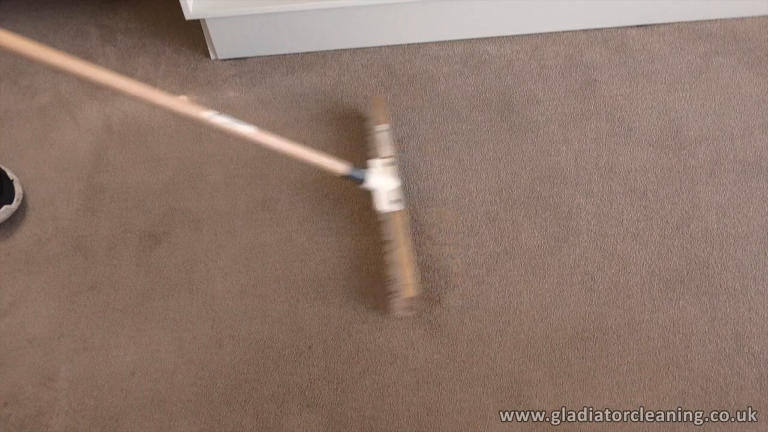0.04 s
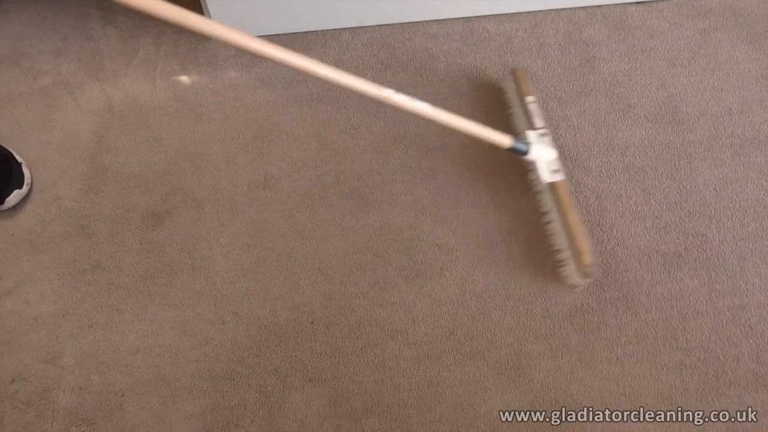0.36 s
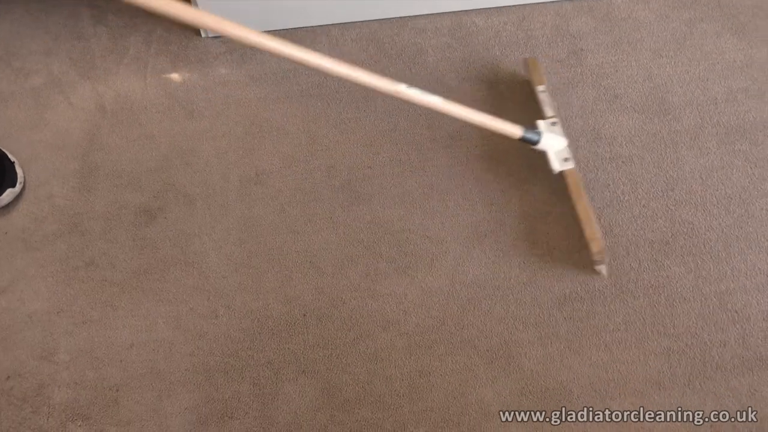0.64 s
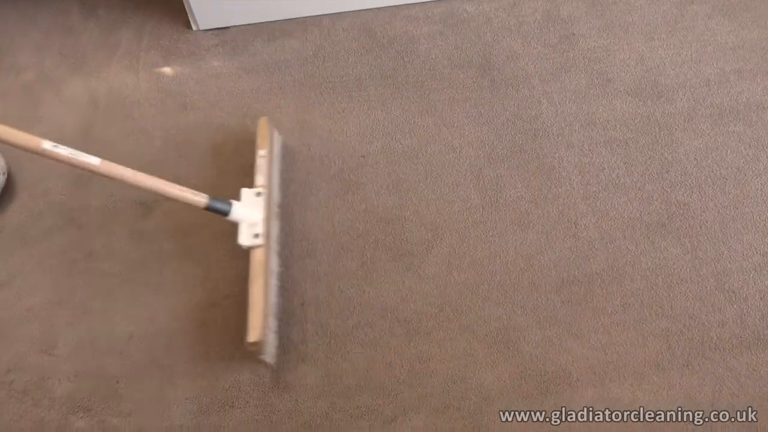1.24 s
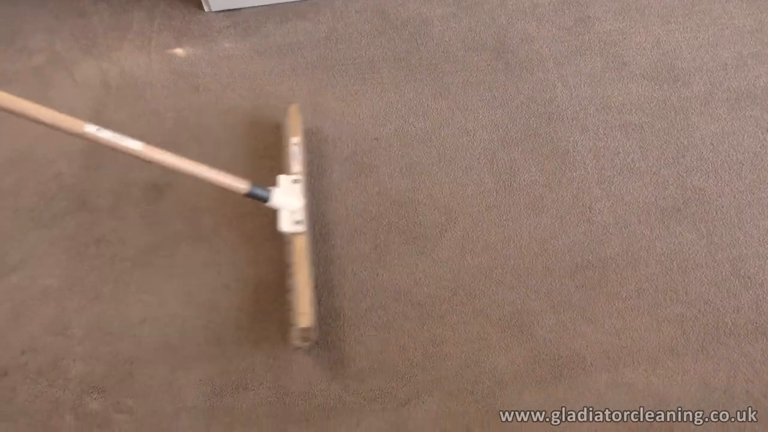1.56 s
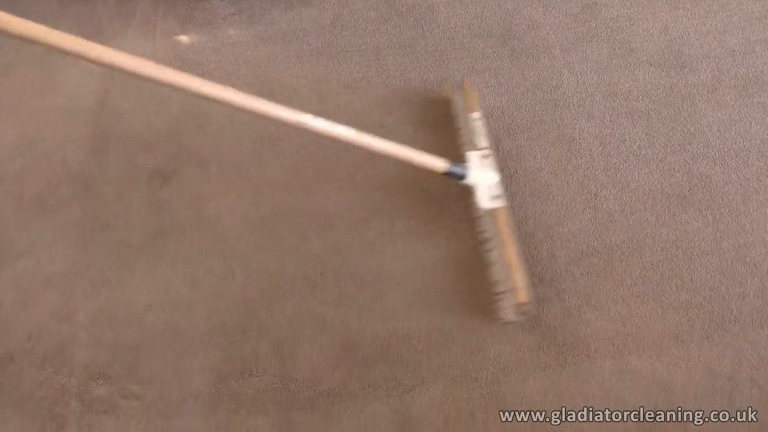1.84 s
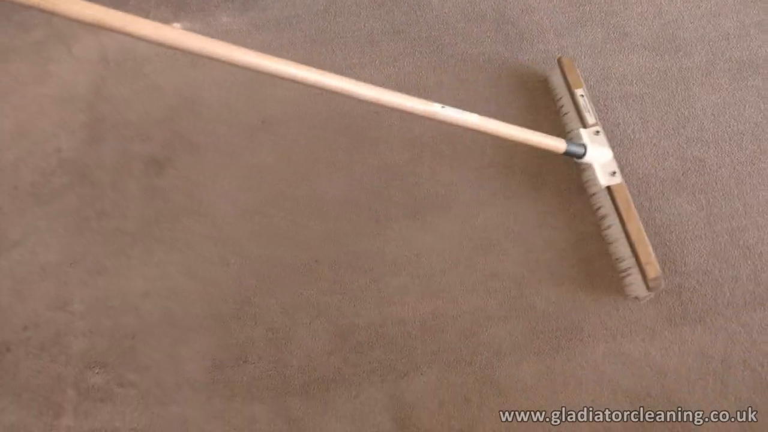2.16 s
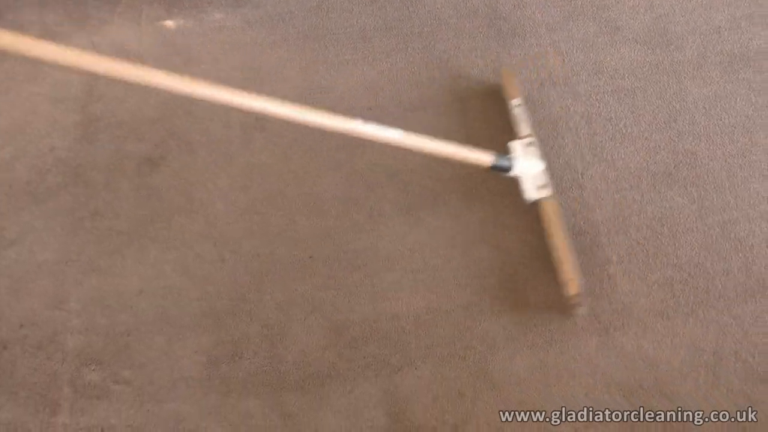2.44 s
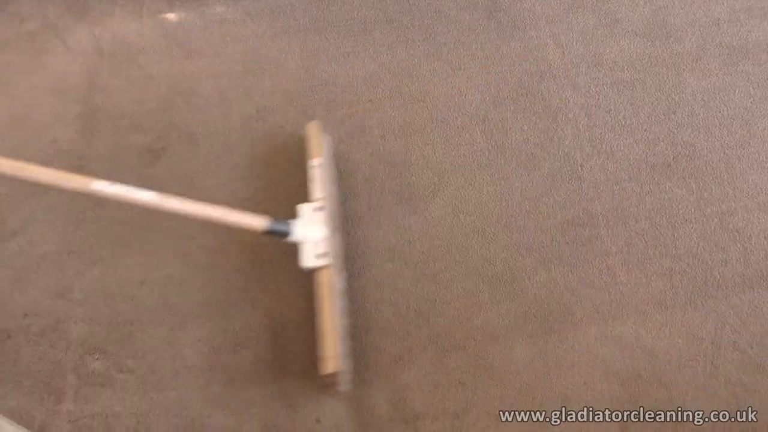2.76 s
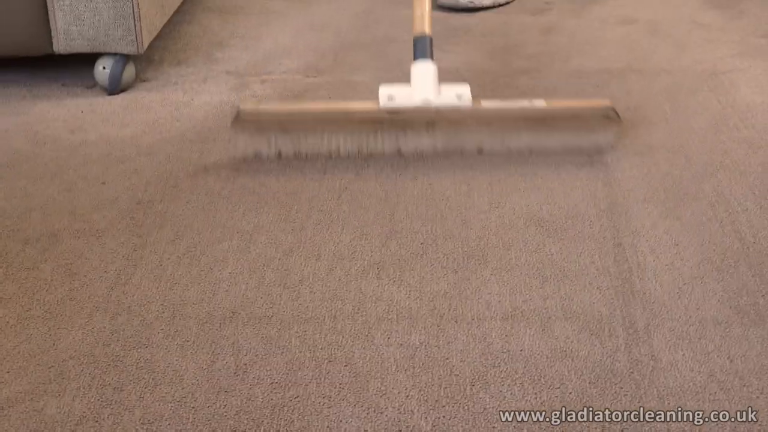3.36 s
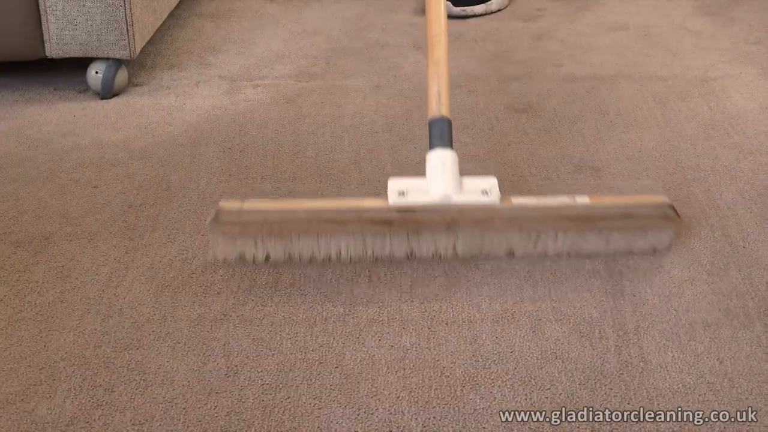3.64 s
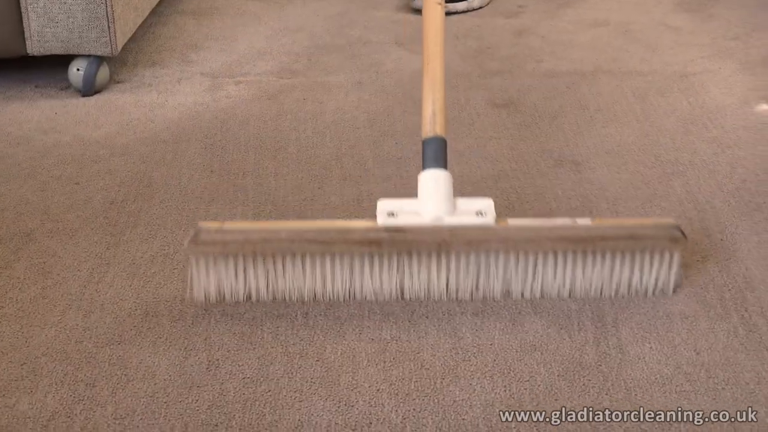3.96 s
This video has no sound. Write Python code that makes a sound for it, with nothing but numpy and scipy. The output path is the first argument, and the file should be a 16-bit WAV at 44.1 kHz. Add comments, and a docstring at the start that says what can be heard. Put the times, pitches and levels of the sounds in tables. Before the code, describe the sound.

A bristle broom swishes back and forth over carpet in five long, hissing strokes.

```python
"""In a furnished room, a wide bristle broom is pushed and pulled over a carpet in five long strokes.
Bristle tips flick off the carpet and hiss; tufts tug at the wooden head and make a lower scrubbing sound.
Lightly skimming bristles sing briefly, and the handle ticks and creaks around the first few turns.
The floor takes a few soft thuds over a faint rumble, and a low hum, like a motor gathering speed,
swells under the last two strokes. It is all heard in mono."""
import sys
import numpy as np
from scipy import signal
from scipy.fft import rfft, irfft
from scipy.io import wavfile

SR = 44100
rng = np.random.default_rng(int(sys.argv[2]) if len(sys.argv) > 2 else 0)


def store_pcm(level_fs):
    """Save levels as 16-bit WAV."""
    pcm = np.round(np.clip(level_fs, -1, 1) * 32767).astype(np.int16)
    wavfile.write(sys.argv[1], SR, np.atleast_2d(pcm).T)


N = 176400  # 4 seconds
T = np.arange(N) / SR

# The tone of the room's rumble. Each row: frequency in Hz, relative level in dB.
RUMBLE_TONE = [(20, -11), (45, 0), (65, -6), (83, 4.5), (105, -8.5), (150, -5), (300, -18), (1000, -33),
               (4000, -29.5), (15000, -67)]
# How the hum swells. Each row: time in seconds, level in dB.
HUM_SWELL = [(2.401, -56), (2.6, -39), (2.75, -30), (2.98, -29), (3.14, -27.5), (3.48, -29), (3.72, -34),
             (3.95, -33), (4.0, -30)]
# The head knocks on the carpet. Each row: start in seconds, level in dB, decay in seconds, pitch in Hz.
HEAD_KNOCKS = [(.425, -31.5, 0.081, 136), (2.1, -33.5, 0.088, 135), (2.72, -34, 0.051, 119),
               (2.92, -32, 0.041, 100), (3.58, -32.5, 0.091, 201), (3.72, -30.5, 0.095, 184)]
# Shifting weight swings the floor. Each row: start in seconds, level in dB, decay in seconds, pitch in Hz.
FLOOR_SWINGS = [(.405, -28.5, .13, 42.2), (1.265, -34, 0.031, 50), (3.89, -32, .04, 36)]

# The handle ticks. Each row: start in seconds, level in dB, pitch in Hz.
HANDLE_TICKS = [(0.6976, -30.5, 3420), (1.4719, -26.5, 4800), (2.371, -35, 3130)]
# The notes in one tick. Each row: multiple of its pitch, relative level in dB, decay in seconds.
TICK_NOTES = [(.62, -9.5, 0.0013), (1, -0.5, .0011), (1.25, -4, 0.00068)]
# The handle creaks. Each row: middle in seconds, half length in seconds, level in dB, pitch in Hz.
HANDLE_CREAKS = [(0.376, 0.029, -44, 2740), (0.548, 0.013, -44, 2640), (1.423, 0.013, -45, 2660),
                 (1.484, 0.017, -45.5, 2650), (1.53, 0.0087, -50, 2700)]
# Bristles sing. Each row: middle in seconds, half length in seconds, level in dB, pitch in Hz.
BRISTLE_SKIMS = [(0.97, 0.0093, -37, 4470), (3.04, .06, -48, 7150), (3.292, 0.043, -49, 8730),
                 (3.45, 0.087, -45, 8300)]

# The tone of the hiss when pushing, pulling, and pushing straight at the microphone.
# Each row: frequency in Hz, relative level in dB.
PUSH_TONE = [(900, -16), (1700, -5), (2200, -2), (2750, 3), (3500, 0), (4100, 1.5), (4750, 3.5),
             (5600, -2.5), (7800, 0), (9500, -.5), (11200, -2), (13000, -2.5), (15600, -7.5)]
PULL_TONE = [(900, -48), (1700, -24), (2250, -8.5), (2800, 2.5), (3900, 0.5), (4700, 5.5), (5500, -1),
             (6300, -1), (7200, 3.5), (8800, -0.5), (10200, 1.5), (11300, -3), (13300, 0.5), (15600, -7.5)]
FRONT_TONE = [(900, -18), (1700, -9), (2350, -6.5), (2750, 0.5), (3400, -5), (4050, -2.5), (4750, 0),
              (5700, -6), (7200, 0), (8700, -1), (11300, -4), (13000, -1.5), (15600, -8.5)]
# The tone of the carpet dragging on the head, and of the wooden head's own ring.
# Each row: frequency in Hz, relative level in dB.
DRAG_TONE = [(40, -6), (100, -9), (170, -2), (260, -.5), (370, 0.5), (480, 1.5), (780, -1.5), (960, -3),
             (1250, -7.5), (1700, -9.5), (2400, -14.5), (5000, -28.5)]
HEAD_TONE = [(150, -28), (400, -3.5), (560, 2), (770, 3), (980, 3), (1250, -5.5), (1800, -11), (3500, -27)]
# The strokes, with one list for each; the last push comes straight at the microphone.
# Each row: time in seconds, hiss level in dB, scrub level in dB (both before the boosts in sweep).
PUSH_STROKES = [
    [(.11, -69, -66), (.135, -53, -49.5), (.246, -42, -38), (.374, -38.5, -36.5), (.42, -38, -34),
     (.508, -35, -34), (.574, -39.5, -37), (.62, -45, -38), (.66, -58, -55)],
    [(1.5, -58, -52), (1.542, -47.5, -49), (1.592, -53, -45.5), (1.624, -39, -35), (1.695, -36.5, -33),
     (1.724, -32, -28.5), (1.825, -31, -28.5), (1.88, -34, -31.5), (1.96, -36, -34), (2.194, -36.5, -35.5),
     (2.262, -46, -42.5), (2.29, -59, -57), (2.31, -60, -57)],
    [(3.14, -59, -50), (3.178, -47.5, -45.5), (3.225, -50.5, -46), (3.262, -39, -33), (3.312, -44.5, -37.5),
     (3.356, -35.5, -31), (3.45, -32, -29), (3.6, -34.5, -30), (3.79, -33, -31), (3.87, -40, -37),
     (3.945, -41.5, -37.5), (4.0, -58, -53)],
]
PULL_STROKES = [
    [(.66, -53, -48), (.71, -50.5, -52), (.752, -40.5, -39.5), (.86, -35, -34.5), (1.02, -32.5, -32),
     (1.212, -34, -33), (1.372, -38, -37.5), (1.468, -47.5, -45), (1.5, -65, -60)],
    [(2.31, -54, -51), (2.39, -51, -51), (2.432, -41.5, -40), (2.552, -34, -33.5), (2.672, -32, -32.5),
     (2.81, -33.5, -31), (3.054, -38.5, -38), (3.108, -45.5, -44.5), (3.14, -57, -53)],
]


def amp(db):
    """Turns decibels into a number to multiply a sound by."""
    return 10 ** (np.asarray(db) / 20)


def evened(x):
    """Scales a sound to an average (rms) strength of 1."""
    return x / np.sqrt(np.mean(x ** 2) + 1e-20)


def colour(x, tone):
    """Gives a sound the lows and highs of a tone table, at a strength of 1."""
    hz, db = np.transpose(tone)
    freqs = np.fft.rfftfreq(N, 1 / SR)
    gain = amp(np.interp(np.log(freqs + 1), np.log(hz), db))
    return evened(irfft(rfft(x) * gain, N))


def band(hz, width_hz):
    """Noise kept to a band around one pitch."""
    freqs = np.fft.rfftfreq(N, 1 / SR)
    cut = 1 + (2 * (freqs - hz) / width_hz) ** 4
    return evened(irfft(rfft(rng.standard_normal(N)) / cut, N))


def wander(rate_hz):
    """A random wobble, up to about this fast."""
    return band(0, 2 * rate_hz)


def bump(start, rise_s, decay_s):
    """A level that rises softly, then dies away."""
    age = T - start
    return np.clip(age / rise_s, 0, 1) * np.exp(-np.maximum(age - rise_s, 0) / decay_s)


def bell_curve(middle, half_s):
    """A level that swells and fades evenly around one moment."""
    return np.exp(-.5 * ((T - middle) / half_s) ** 2)


def clicks(per_s, spread_db):
    """Tiny clicks of bristles letting go at random, most of them small."""
    sizes = amp(spread_db * np.minimum(rng.exponential(1, N), 5))
    return sizes * rng.choice([-1, 1], N) * (rng.random(N) < per_s / SR)


def room_echo(x, echo_db=-14, fade_s=0.054):
    """Adds the short echo of a furnished room, which drops 60 dB in fade_s."""
    t = T[:SR // 2]
    tail = rng.standard_normal(len(t)) * amp(-60 * t / fade_s) * (t > .005)
    return x + amp(echo_db) * signal.fftconvolve(x, tail / np.linalg.norm(tail))[:N]


def room_rumble(level_db=-42.5, start=0.15, rise_s=0.37):
    """A faint, deep noise that fades in and stays."""
    fade_in = np.clip((T - start) / rise_s, 0, 1) ** 2
    return amp(level_db) * colour(rng.standard_normal(N), RUMBLE_TONE) * fade_in


def hum(start_hz=58.1, climb_hz_per_s=10.2, octave_db=-16.5, waver_db=1.2):
    """A low, wavering note that slowly climbs, with a weak copy an octave higher."""
    times, db = np.transpose(HUM_SWELL)
    pitch = start_hz + climb_hz_per_s * (T - times[0])
    phase = 2 * np.pi * np.cumsum(pitch) / SR
    level = amp(np.interp(T, times, db) + waver_db * wander(rate_hz=8.9)) * (T > times[0])
    return level * evened(np.sin(phase) + amp(octave_db) * np.sin(2 * phase))


def floor_thuds(knock_rise_s=0.015, swing_rise_s=0.021):
    """The head knocks dully on the carpet, and the floor swings briefly under shifting weight."""
    out = np.zeros(N)
    for start, db, decay_s, hz in HEAD_KNOCKS:
        dull_noise = evened(np.tanh(band(hz, width_hz=0.66 * hz)))  # tanh rounds off the peaks
        out += amp(db) * bump(start, knock_rise_s, decay_s) * dull_noise
    for start, db, decay_s, hz in FLOOR_SWINGS:
        out += amp(db) * bump(start, swing_rise_s, decay_s) * np.sin(2 * np.pi * hz * (T - start))
    return out


def handle_ticks(snap_db=-12, snap_s=0.00057):
    """The handle's joint snaps and rings for an instant when the load on it reverses."""
    out = np.zeros(N)
    for start, db, hz in HANDLE_TICKS:
        age = np.maximum(T - start, 0)
        ring = sum(amp(note_db) * np.exp(-age / decay_s) * np.sin(2 * np.pi * multiple * hz * age)
                   for multiple, note_db, decay_s in TICK_NOTES)
        snap = amp(snap_db) * (T > start) * np.exp(-age / snap_s) * rng.standard_normal(N)
        out += amp(db) * (ring + snap)
    return out


def handle_creaks(slip_db=1.5):
    """The joint slips unevenly as it twists, making thin creaks."""
    slips = evened(amp(slip_db * wander(rate_hz=200)))
    return sum(amp(db) * bell_curve(middle, half_s) * band(hz, width_hz=310) * slips
               for middle, half_s, db, hz in HANDLE_CREAKS)


def bristle_skims():
    """Lightly pressed bristles ring together close to one pitch."""
    return sum(amp(db) * bell_curve(middle, half_s) * band(hz, width_hz=0.063 * hz)
               for middle, half_s, db, hz in BRISTLE_SKIMS)


def stroke_level(strokes, column, fade_s=0.01):
    """Follows one level column through the strokes, fading to silence at the ends of each."""
    power = np.zeros(N)
    for stroke in map(np.array, strokes):
        times, db = stroke[:, 0], stroke[:, column]
        inside_s = np.minimum(T - times[0], times[-1] - T)
        fade = np.clip(.5 + inside_s / fade_s, 0, 1)
        power += fade * amp(np.interp(T, times, db)) ** 2
    return np.sqrt(power)


def sweep(strokes, hiss_tone, hiss_boost_db, scrub_boost_db):
    """Flicking tips hiss and tugging tufts scrub; the harder the stroke, the more the head rings."""
    judder = wander(rate_hz=70)  # uneven drag shakes hiss and scrub together
    force = stroke_level(strokes, column=2)
    tips = colour(clicks(per_s=14000, spread_db=1.5), hiss_tone)
    drag = colour(clicks(per_s=4000, spread_db=2), DRAG_TONE)
    head = colour(clicks(per_s=4000, spread_db=2), HEAD_TONE)
    head_share = amp(-3.5) * force / amp(-34)  # 3.5 dB below the drag when the force is at -34 dB
    tufts = (drag + head_share * head) / np.hypot(1, head_share)
    hiss = tips * amp(hiss_boost_db + .5 * judder) * stroke_level(strokes, column=1)
    scrub = tufts * amp(scrub_boost_db + .32 * judder) * force
    return hiss + scrub


def scene():
    """The broom in the room, over thuds, hum and rumble; left and right are the same."""
    broom = sweep(PUSH_STROKES[:-1], PUSH_TONE, hiss_boost_db=2.37, scrub_boost_db=2.0)
    broom += sweep(PULL_STROKES, PULL_TONE, hiss_boost_db=2.0, scrub_boost_db=1.5)
    broom += sweep(PUSH_STROKES[-1:], FRONT_TONE, hiss_boost_db=1.6, scrub_boost_db=1.33)
    mono = room_rumble()
    mono += room_echo(broom + handle_ticks() + handle_creaks() + bristle_skims())
    mono += floor_thuds() + hum()
    return np.array([mono, mono])


def record(dry, low_cut_hz=29, high_cut_hz=15780):
    """The microphone loses the deepest bass, then the highest treble is cut off sharply."""
    bass_cut = signal.butter(2, low_cut_hz, "high", fs=SR, output="sos")
    treble_cut = signal.firwin(1023, high_cut_hz, window=("kaiser", 9), fs=SR)
    return signal.oaconvolve(signal.sosfilt(bass_cut, dry), treble_cut[None], "same")


dry = scene()
out = record(dry)
store_pcm(out)
```